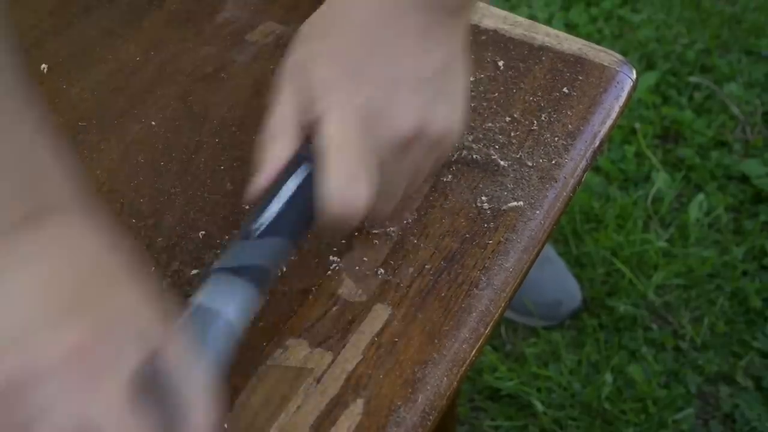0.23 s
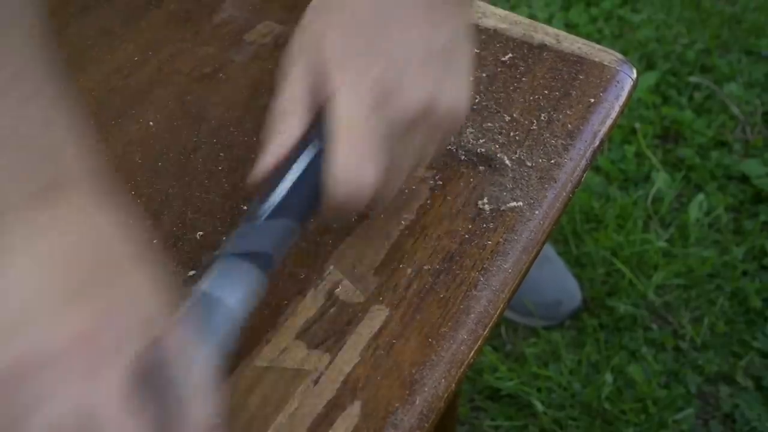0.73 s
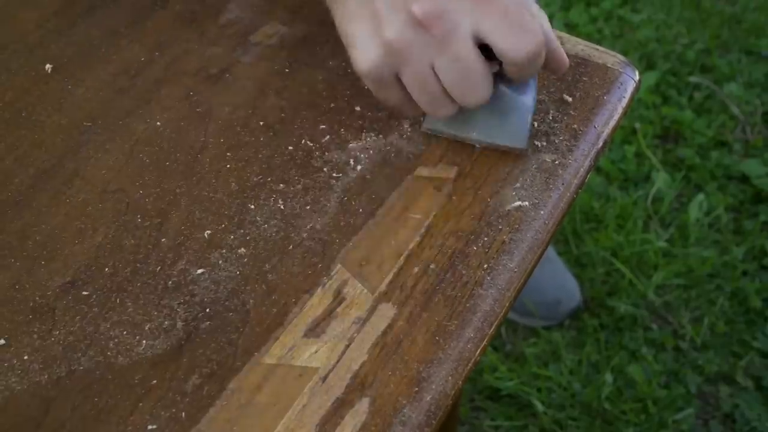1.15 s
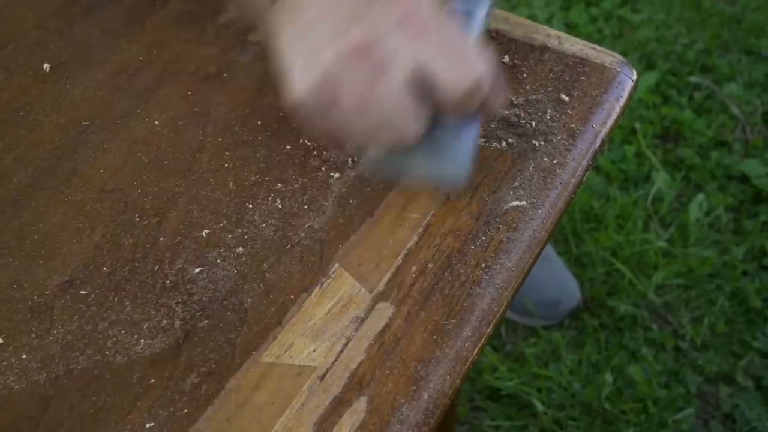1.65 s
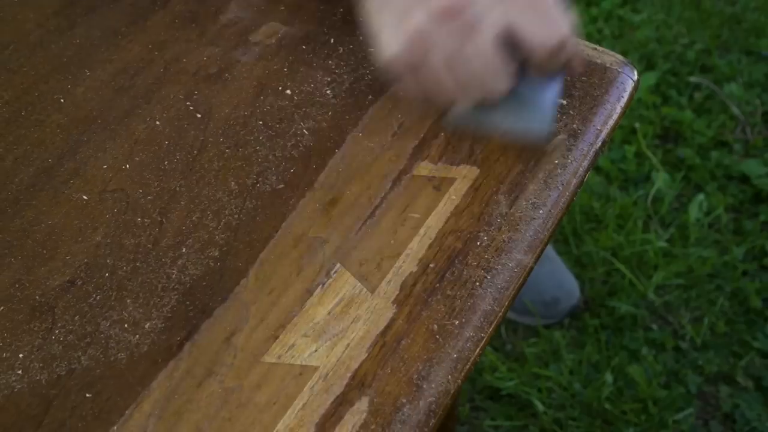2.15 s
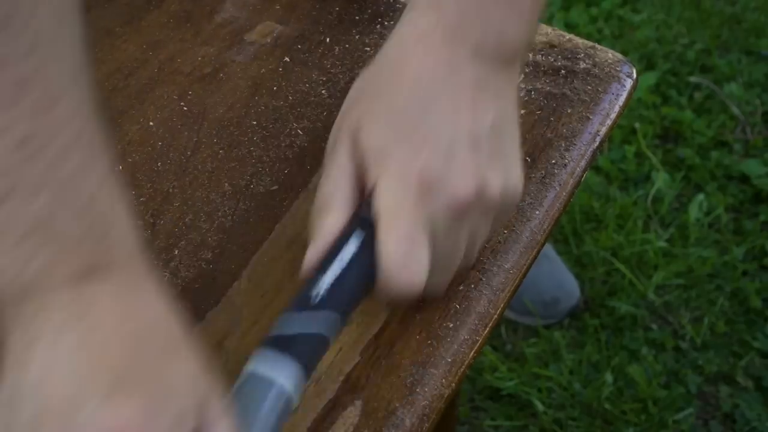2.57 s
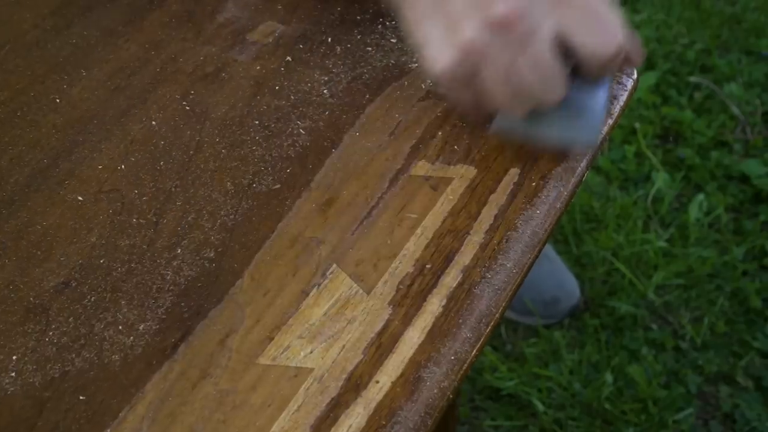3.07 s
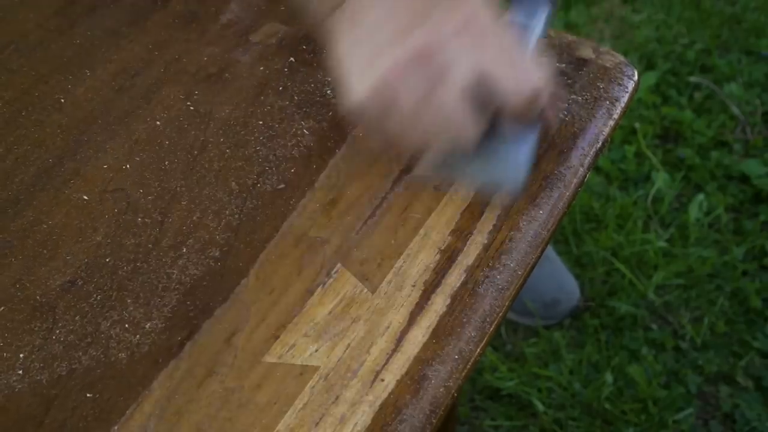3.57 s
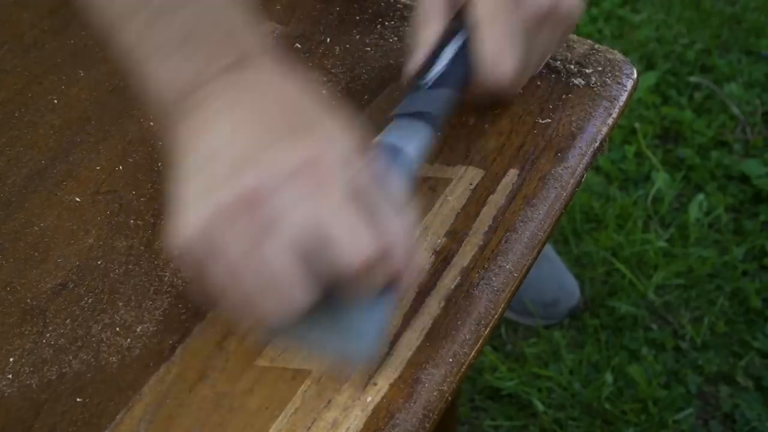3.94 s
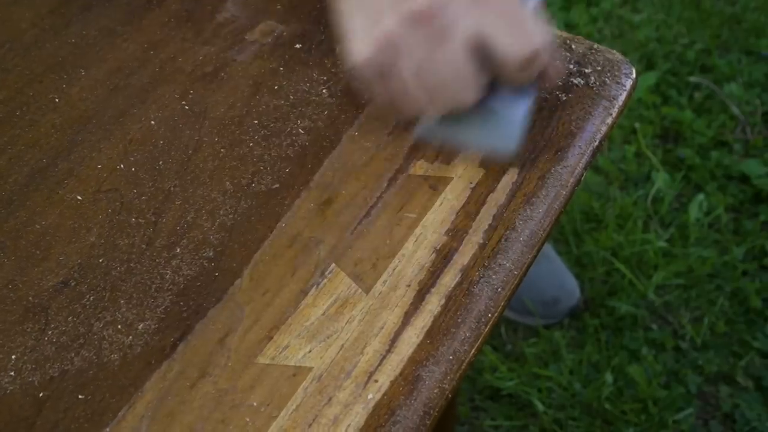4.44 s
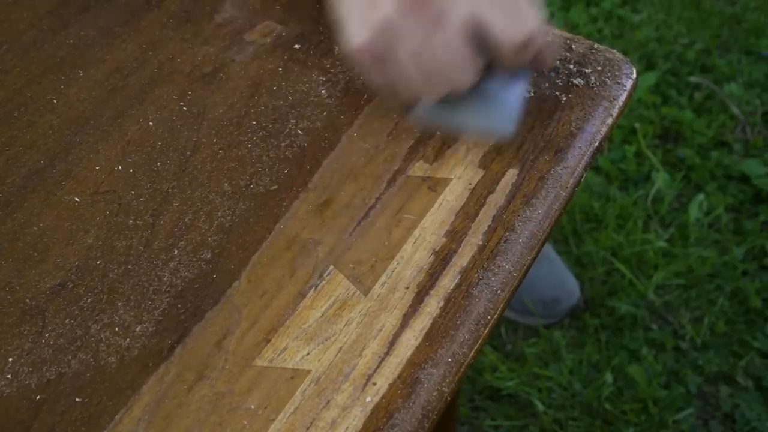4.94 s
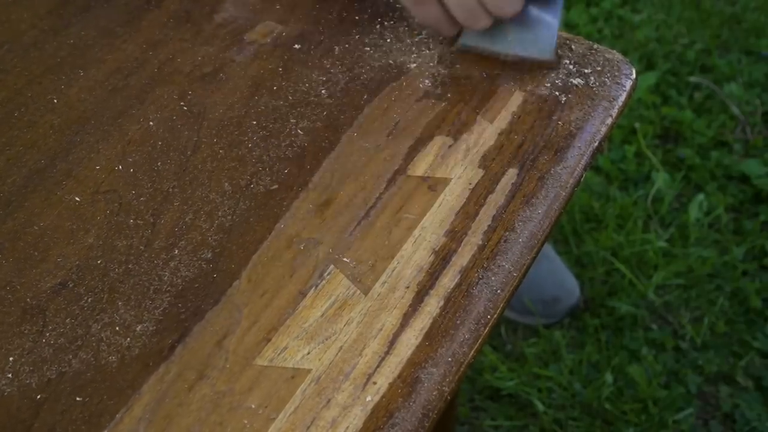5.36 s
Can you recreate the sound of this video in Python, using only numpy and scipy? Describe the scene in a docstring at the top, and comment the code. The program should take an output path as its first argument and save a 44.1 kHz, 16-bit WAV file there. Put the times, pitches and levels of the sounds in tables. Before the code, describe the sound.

A hand-held steel scraper strips old finish from a wooden table outdoors, heard close and dry. Bright, gritty pulls of about a third of a second alternate with duller, hollow rubbing returns. Mid-pull the edge bites, crackling the varnish and ringing the blade. Snags, ticks, wooden knocks and tiny squeaks fall between. The table booms softly underneath, with faint steady air behind.

```python
"""Two-handed scraper on a wooden table top

A steel scraper strips old finish, outdoors and close by, over a faint steady noise of air.
On each pull the edge skids, then bites: chattering fractures crack varnish and ring the blade.
Returns rub lightly over ripples: noise lumps plus a burr whose pitch follows the stroke speed.
Snags, taps and squeaks punctuate it; steel and table modes ring; the table booms softly under the load."""
import sys
import numpy as np
from scipy import signal
from scipy.fft import rfft, irfft, next_fast_len
from scipy.io import wavfile
from scipy.ndimage import map_coordinates

SR = 44100
rng = np.random.default_rng(int(sys.argv[2]) if len(sys.argv) > 2 else 0)


def to_wav(sig):
    """Store sig (one row per channel, or 1-D mono) as 16-bit WAV at the path in sys.argv[1].

    Samples outside -1..1 are clipped; the rate is SR.
    """
    pcm = np.clip(np.atleast_2d(sig), -1, 1) * 32767
    pcm = np.round(pcm).astype(np.int16)
    wavfile.write(sys.argv[1], SR, pcm.T)  # frames by channels


N = 247401
T_S = np.arange(N) / SR
FFT_SIZE = 2 * next_fast_len(N // 2 + 8192)  # padded so that filter tails do not wrap
FFT_HZ = np.fft.rfftfreq(FFT_SIZE, 1 / SR)

# spectrum of varnish and grit torn by the edge: freq_hz, relative_db
RASP_SPECTRUM = [(40, -58), (350, -22), (800, -5.5), (1100, -9.5), (1700, 0.5), (2500, 1.5), (4000, -2),
                 (6700, -0.5), (7500, -11.5), (8800, -13.5), (11000, -12), (13000, -23), (16000, -30)]
# spectrum of the ringing blade: freq_hz, relative_db
RING_SPECTRUM = [(500, -36), (1050, -20), (1300, -9), (1400, -3), (1465, 0), (1600, -4), (1750, -14),
                 (2400, -23), (5000, -45)]
# spectrum of the dull rub and knock of wood: freq_hz, relative_db
RUB_SPECTRUM = [(40, -53), (100, -28), (280, -8), (400, 1.5), (600, 1.5), (1000, 2), (1300, 0),
                (1600, -36.5), (3500, -15), (8000, -57)]
# spectrum of shattering varnish and fine dust: freq_hz, relative_db
FIZZ_SPECTRUM = [(2000, -39), (6500, -2), (8500, -9), (10000, -2.5), (13000, -6.5), (14000, -21),
                 (16000, -10.5)]


def amp(db):
    """Decibels to gain."""
    return 10 ** (np.asarray(db) / 20)


def unit(x):
    """x at rms 1."""
    return x / np.sqrt(np.mean(x ** 2) + 1e-20)


def wobble(knots_per_s):
    """Smooth random curve: a spline through normal random knots."""
    knots = rng.standard_normal(int(N * knots_per_s / SR) + 4)
    return map_coordinates(knots, [np.arange(N) * knots_per_s / SR])


def gate(start_s, end_s, edge_s):
    """1 between start and end, with linear edges."""
    return np.clip(np.minimum(T_S - start_s, end_s - T_S) / edge_s + .5, 0, 1)


def coloured(x, spectrum):
    """x through a minimum-phase filter with the given spectrum, at rms 1."""
    hz, db = np.transpose(spectrum)
    magnitude = amp(np.interp(np.log(FFT_HZ + 1), np.log(hz), db))
    cepstrum = irfft(np.log(magnitude))
    cepstrum[1:FFT_SIZE // 2] *= 2  # fold to causal
    cepstrum[FFT_SIZE // 2 + 1:] = 0
    return unit(irfft(rfft(x, FFT_SIZE) * np.exp(rfft(cepstrum)))[:N])


def fractures(rate_per_s, scatter_db):
    """Tiny breaks at random moments, of random sign and unequal size, at rms 1."""
    breaks = rng.random(N) < rate_per_s / SR
    sizes = amp(scatter_db * rng.standard_normal(N))
    return unit(breaks * rng.choice([-1, 1], N) * sizes)


def air():
    """Open air: steady coloured noise."""
    # spectrum of the air: freq_hz, relative_db
    air_spectrum = [(25, -41), (120, 2.5), (500, 10), (1500, 5), (5000, -13.5), (15000, -43)]
    return amp(-71.5) * coloured(rng.standard_normal(N), air_spectrum)


def strokes():
    """Pulls and returns as rows of one shape, ending in ripple pitch and growth powers."""
    # scraper pulled along the grain:
    # start_s, end_s, fastest_share, rub_db, blade_ring_db, hiss_db, thump_db
    pulls = [(0.238, 0.569, 0.59, -56.5, -36, -51.5, -66), (0.904, 1.22, 0.65, -56.5, -41, -50.5, -70.0),
             (1.532, 1.81, 0.49, -56.5, -41, -51.0, -70), (1.997, 2.31, 0.3, -57, -43, -52.0, -73.0),
             (2.692, 3.078, 0.45, -53.5, -42, -52.0, -61), (3.42, 3.771, 0.32, -55.5, -40.5, -50, -61),
             (4.1, 4.394, 0.397, -54.0, -43.5, -50.5, -82), (4.67, 4.928, 0.39, -59.5, -45.5, -54, -57.5),
             (5.174, 5.419, 0.41, -59.0, -50.5, -54.5, -55)]
    # scraper pushed forward again:
    # start_s, end_s, fastest_share, rub_db, blade_ring_db, hiss_db, thump_db, ripple_hz
    returns = [(-0.088, 0.23, 0.68, -50.5, -63.0, -59, -69.0, 680.0),
               (0.554, 0.897, 0.31, -48, -71, -54, -71, 670.0),
               (1.224, 1.523, 0.63, -49, -73, -57, -83, 560.0),
               (1.813, 2.082, 0.59, -53.5, -70, -57.0, -67.0, 630.0),
               (2.301, 2.7, 0.73, -47.5, -49.5, -53.5, -77.0, 700.0),
               (3.071, 3.424, 0.47, -48, -52.5, -55, -67.0, 760.0),
               (3.765, 4.092, 0.68, -52.5, -76, -56.5, -70.0, 580.0),
               (4.387, 4.676, 0.41, -49.5, -57, -56, -57, 680.0),
               (4.902, 5.188, 0.44, -50.0, -57.5, -57.0, -58.5, 590.0),
               (5.411, 5.72, 0.53, -60, -72, -59.5, -66, 640.0)]
    # gain as a power of edge speed: rub_power, blade_ring_power, hiss_power, powder_power
    pull_growth = (1.17, 2.73, 1.36, 1.6)
    # same for the returns: rub_power, blade_ring_power, hiss_power, powder_power
    return_growth = (1.66, 4.6, 1.25, 2.7)
    pull_ripple_hz = 876.3  # at full speed
    return ([(*row, pull_ripple_hz, pull_growth) for row in pulls]
            + [(*row, return_growth) for row in returns])


def flexing():
    """Table boom: steady low noise with a wavering level; heavier weight shifts thump early in a stroke."""
    # spectrum of the flexing table: freq_hz, relative_db
    flex_spectrum = [(25, -56), (50, -35), (75, -20), (100, -6), (132, 1.5), (150, -1.5), (170, 3.5),
                     (220, -8), (300, -11), (600, -52.5)]
    thump_share, rise_s, fall_s = .18, .02, .035
    load = amp(-75.5 + 2 * wobble(12))
    for start_s, end_s, *_, thump_db, _, _ in strokes():
        age_s = T_S - start_s - thump_share * (end_s - start_s)
        width_s = np.where(age_s < 0, rise_s, fall_s)
        thump = amp(thump_db) * np.exp(-(age_s / width_s) ** 2)
        load = np.maximum(load, thump)
    return load * coloured(fractures(760, scatter_db=2), flex_spectrum)


def squeaking():
    """Squeaks and grunts on bare wood: short unsteady gliding tones with a faint octave."""
    # squeaks, levels before a common trim: start_s, length_s, start_hz, end_hz, level_db
    squeaks = [(1.39, .02, 2750, 2650, -60), (3.158, .025, 2980, 2900, -60), (4.135, .035, 680, 1000, -56),
               (4.405, .02, 2780, 2880, -68), (4.575, .072, 980, 470, -54), (4.897, .033, 2810, 2780, -59),
               (4.934, .018, 2850, 3000, -66)]
    out = np.zeros(N)
    for start_s, length_s, start_hz, end_hz, level_db in squeaks:
        end_s = start_s + length_s
        hz = np.interp(T_S, [start_s, end_s], [start_hz, end_hz]) + 55 * wobble(400)
        phase = 2 * np.pi * np.cumsum(hz) / SR
        tone = np.sin(phase) + .12 * np.sin(2 * phase)
        out += amp(level_db - 2 + 2 * wobble(150)) * gate(start_s, end_s, edge_s=.012) * tone
    return out


def tapping():
    """Steel set down, bumping a ridge or flicking a chip: decaying tick and longer wooden knock."""
    # taps, levels before common trims: start_s, tick_db, knock_db
    taps = [(0.303, -45, -50), (0.957, -55, -54), (1.165, -41, -58), (1.272, -47, -72),
            (1.3027, -44.5, -65), (1.342, -44, -57), (1.8755, -38.5, -62), (1.886, -42.5, -49),
            (2.9747, -43, -45.5), (3.194, -40.5, -48), (3.7817, -72, -54.5), (3.859, -43, -53),
            (3.902, -40, -71), (4.706, -42, -46), (4.939, -54, -54), (5.459, -59, -52), (5.572, -45, -46.5)]
    tick_t60_s, knock_t60_s = .016, .076
    tick, knock = np.zeros(N), np.zeros(N)
    for start_s, tick_db, knock_db in taps:
        age_s = np.maximum(T_S - start_s, 0)
        tick += (T_S >= start_s) * amp(tick_db - 7.5 - 60 * age_s / tick_t60_s)
        knock += (T_S >= start_s) * amp(knock_db - 5.5 - 60 * age_s / knock_t60_s)
    tick_noise = coloured(rng.standard_normal(N), RASP_SPECTRUM)
    knock_noise = coloured(rng.standard_normal(N), RUB_SPECTRUM)
    return tick * tick_noise + knock * knock_noise


def catching():
    """Brief snags of the edge: gated grit, blade ping and wooden knock, all from fractures."""
    # snags, levels before common trims: start_s, length_s, rasp_db, blade_ring_db, knock_db
    catches = [(0.0, 0.0076, -36, -62, -37.5), (0.0457, 0.015, -53, -65, -36),
               (0.11, 0.0092, -41, -58, -45), (.144, 0.014, -38, -42.5, -32.5),
               (0.501, 0.012, -30, -31, -50), (0.621, 0.0162, -32.5, -61, -38),
               (0.644, 0.0148, -34.5, -63, -46), (0.779, 0.027, -47, -48, -37.5),
               (1.06, .014, -22, -42, -62), (1.386, 0.022, -40.5, -62, -38),
               (1.735, 0.0088, -30.5, -30, -56), (2.0114, .022, -46.5, -58, -35.5),
               (2.739, .0084, -50, -50, -46), (2.784, .014, -31, -26.5, -43),
               (3.459, 0.032, -35.5, -29.5, -40.5), (3.95, .03, -48, -65, -37.5),
               (4.004, 0.01127, -41.5, -59, -40.5), (4.868, .014, -39.5, -36.5, -53),
               (5.182, 0.0078, -47.5, -42.5, -44.5)]
    gains = np.zeros((3, N))
    for start_s, length_s, rasp_db, ring_db, knock_db in catches:
        peaks = amp([[rasp_db - 14.5], [ring_db - 10.5], [knock_db - 11.5]])
        gains += peaks * gate(start_s, start_s + length_s, edge_s=.0011)
    spectra = (RASP_SPECTRUM, RING_SPECTRUM, RUB_SPECTRUM)
    return sum(gain * coloured(fractures(12000, scatter_db=2), spectrum)
               for gain, spectrum in zip(gains, spectra))


def stroke_speed(start_s, end_s, fastest_share):
    """Edge speed, 0 to 1: breaks free from rest, peaks, and dies as the hands turn round."""
    creep_share, rest_s, grip_s = .11, .008, .045  # creep: speed floor inside the gate
    peak_s = start_s + (end_s - start_s) * fastest_share
    swing = np.sin(np.pi * np.interp(T_S, [start_s, peak_s, end_s], [0, .5, 1]))
    moving = gate(start_s + rest_s, end_s - rest_s, edge_s=grip_s)
    return moving * (creep_share + (1 - creep_share) * swing)


def slide_controls():
    """Rub, ring, hiss and powder gains and ripple pitch: all rise with stroke speed."""
    pitch_power = .15
    gains, pitch_hz = np.zeros((4, N)), np.full(N, 876.3)
    for start_s, end_s, fastest, rub_db, ring_db, hiss_db, _, ripple_hz, growth in strokes():
        speed = stroke_speed(start_s, end_s, fastest)
        moving = speed > 0
        full_speed_gains = amp([[rub_db], [ring_db], [hiss_db], [hiss_db]])
        added = full_speed_gains * speed[moving] ** np.array(growth)[:, None]
        gains[:, moving] = np.hypot(gains[:, moving], added)
        pitch_hz[moving] = ripple_hz * speed[moving] ** pitch_power
    spacing = np.exp(.17 * wobble(16))  # ripple spacing varies along the board
    return (*gains, pitch_hz * spacing)


def ripples(pitch_hz, spread):
    """Burr of the edge over uneven ripples: a sine of jittered pitch and random level."""
    phase = np.cumsum(pitch_hz * np.exp(spread * wobble(450))) / SR
    return unit(np.sin(2 * np.pi * phase) * amp(3.8 * wobble(160)))


def sliding():
    """Light contact: dull rub with a burr, hissing dust and crumbs on wood; the blade sings softly."""
    # spectrum of dust and crumbs: freq_hz, relative_db
    hiss_spectrum = [(40, -68), (200, -19), (1000, 2), (2000, 5.5), (3000, 3), (4500, 0), (6600, -1.5),
                     (7500, -9), (9000, -10.5), (11500, -9.5), (13000, -18), (16000, -25)]
    rub_gain, ring_gain, hiss_gain, powder_gain, pitch_hz = slide_controls()
    rub = amp(-5) * coloured(fractures(700, scatter_db=1), RUB_SPECTRUM)
    rub += amp(-7.5) * ripples(pitch_hz, spread=.2)
    lumps = amp(1.55 * wobble(40))
    dust = amp(-3) * fractures(7000, scatter_db=4.5)
    crumbs = amp(-8) * fractures(130, scatter_db=3)
    hiss = amp(-3.64) * coloured(dust + crumbs, hiss_spectrum)
    patches = amp(-19 + .83 * wobble(19))  # fine dust brightens the hiss
    powder = patches * coloured(fractures(7000, scatter_db=4.5), FIZZ_SPECTRUM)
    wood = rub_gain * lumps * rub + hiss_gain * hiss + powder_gain * powder
    blade = ring_gain * amp(-7) * coloured(fractures(1500, scatter_db=2.5), RING_SPECTRUM)
    grain_bumps = amp(1.5 * wobble(70))
    return grain_bumps * np.array([wood, blade])


def bite_gains():
    """Ring, rasp, fizz and overtone gains: each cut deepens, eases and tears free; depth judders."""
    # edge cutting in mid-pull; levels at the deepest point, before judder and source trims; swell and
    # ease: rasp drop at the start and end of the cut:
    # start_s, end_s, deepest_share, blade_ring_db, rasp_db, fizz_db, overtone_db, swell_db, ease_db
    bites = [(.322, 0.513, 0.48, -35, -40, -45.5, -44, 6, 11.5),
             (1.053, 1.142, 0.49, -42, -43.5, -50, -36, 2, 6.5),
             (1.635, 1.664, 0.26, -45, -37, -46, -40, 6, 5.5),
             (2.08, 2.198, 0.51, -43.5, -39, -45, -40, 11, 2),
             (2.794, 2.979, .42, -39, -40, -44.5, -29.5, 23, 5),
             (3.497, 3.657, .3, -38, -39.5, -47.5, -33, 1.5, 4.5),
             (4.265, 4.344, 0.065, -38.5, -38, -47.5, -32, 0, 10),
             (4.779, 4.879, 0.096, -39, -42.5, -47.5, -43, 6, 23.5),
             (5.284, 5.31, 0.33, -33, -38.5, -42, -41, 8, 6.5)]
    attack_s, release_s, curve_power = .005, .0035, 1.38
    ring_follow, fizz_follow = .3, 1.06  # dB per dB of rasp
    gains = np.zeros((4, N))
    for start_s, end_s, deepest, ring_db, rasp_db, fizz_db, overtone_db, swell_db, ease_db in bites:
        dig_in = np.clip((T_S - start_s) / attack_s + .5, 0, 1)
        tear_off = np.exp(-np.maximum(T_S - end_s + release_s / 2, 0) / release_s)
        cutting = dig_in * tear_off
        on = cutting > .001
        deepest_s = start_s + (end_s - start_s) * deepest
        away = np.interp(T_S[on], [start_s, deepest_s, end_s], [-1, 0, 1])
        depth_db = -np.where(away < 0, swell_db, ease_db) * abs(away) ** curve_power
        levels_db = [ring_db + ring_follow * depth_db, rasp_db + depth_db,
                     fizz_db + fizz_follow * depth_db, overtone_db + depth_db]
        gains[:, on] += cutting[on] * amp(levels_db)
    return gains * amp(1.4 * wobble(90))


def chatter(slip_hz, jitter, release_periods):
    """Stick and slip: a kick at each irregular slip, over near-even cutting that eases until the next."""
    phase = np.cumsum(slip_hz * np.exp(jitter * wobble(200) + .12 * wobble(14))) / SR
    kicks = np.diff(np.floor(phase), prepend=0) * amp(1.2 * rng.standard_normal(N))
    easing = np.exp(-(phase % 1) / release_periods)
    return unit(kicks - kicks.mean()), unit(easing)


def biting():
    """Cutting edge: varnish shatters almost evenly; slips kick the blade and its overtone."""
    # spectrum of the blade's overtone: freq_hz, relative_db
    overtone_spectrum = [(1200, -35), (1900, -12), (2150, -2), (2280, 0), (2450, -11), (4000, -35)]
    ring_gain, rasp_gain, fizz_gain, overtone_gain = bite_gains()
    kicks, easing = chatter(slip_hz=331.2, jitter=.2, release_periods=5.4)
    torn = easing * fractures(22000, scatter_db=1.5) + .4 * kicks
    rasp = amp(-.5) * coloured(torn, RASP_SPECTRUM)
    fizz = amp(-1) * coloured(easing * fractures(24000, scatter_db=5), FIZZ_SPECTRUM)
    ring = amp(-6.5) * coloured(fractures(3500, scatter_db=2) + .66 * kicks, RING_SPECTRUM)
    overtone = amp(-15.5) * coloured(fractures(3500, scatter_db=0) + .47 * kicks, overtone_spectrum)
    wood = rasp_gain * rasp + fizz_gain * fizz
    blade = ring_gain * ring + overtone_gain * overtone
    return np.array([wood, blade])


def travelling(x, share, knots_per_s, drift, count=8):
    """Board-edge echoes over short, randomly drifting paths: the colour shifts."""
    damped = signal.lfilter(*signal.butter(1, 7000, fs=SR), x)  # wood swallows the top of each echo
    out, power = x.copy(), np.ones(N)
    for path_s in np.geomspace(.0008, .007, count):
        delay_samples = path_s * SR * np.exp(drift * wobble(3))
        strength = share * wobble(knots_per_s)
        out += strength * map_coordinates(damped, [np.arange(N) - delay_samples], order=1)
        power += .8 * strength ** 2
    return out / np.sqrt(power)  # evens out the level


def resonate(x, modes):
    """x plus the ringing of the band-pass modes that it drives."""
    f = FFT_HZ
    ringing = sum(amp(db) * 1j * f * width / (centre ** 2 - f * f + 1j * f * width)
                  for centre, width, db in modes)
    return irfft(rfft(x, FFT_SIZE) * (1 + ringing))[:N]


def scene():
    """Contact sounds ring in steel, then in the table top; boom and air are added directly."""
    # modes of the scraper's steel head, level over the direct sound: freq_hz, width_hz, level_db
    steel_modes = [(2160, 393, -6), (4640, 580, -5.5), (6750, 1250, -12.5), (9700, 240, 4.5),
                   (12800, 1400, 1)]
    # modes of the table top, level over the direct sound: freq_hz, width_hz, level_db
    table_modes = [(345.5, 10.8, 4.5), (461.7, 18.6, 2.5), (568, 34, 0.5), (846, 15, -2.5), (1449, 12, -7),
                   (1750, 29, -3.5), (2323, 24, -0.5), (2627, 39, 0), (2808, 48, 0.5), (3085, 85, -5.5),
                   (3426, 52, -1.5), (3720, 45, -4)]
    wood, blade = sliding() + biting()
    wood = travelling(wood, share=.36, knots_per_s=11, drift=.06)
    contacts = wood + blade + catching() + tapping() + squeaking()
    scraping = resonate(resonate(contacts, steel_modes), table_modes)
    return (scraping + flexing() + air())[None]


def record(dry):
    """Thins the deepest bass and keeps nothing above the band limit."""
    bass_cut_hz, top_hz = 66, 15800
    high_pass = signal.butter(4, bass_cut_hz, "highpass", fs=SR, output="sos")
    thinned = signal.sosfilt(high_pass, dry)
    return irfft(rfft(thinned, FFT_SIZE) * (FFT_HZ < top_hz))[:, :N]


dry = scene()
out = record(dry)
to_wav(out)
```